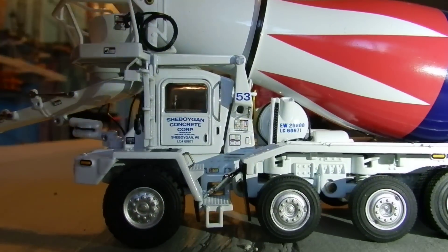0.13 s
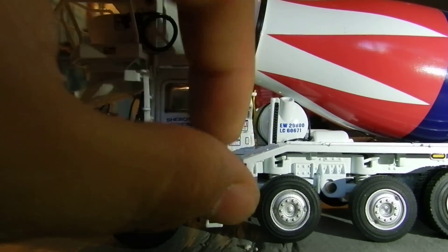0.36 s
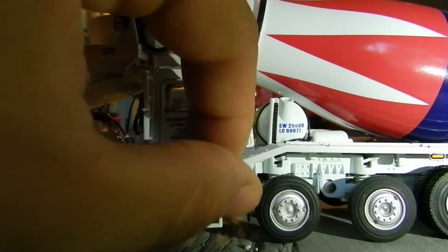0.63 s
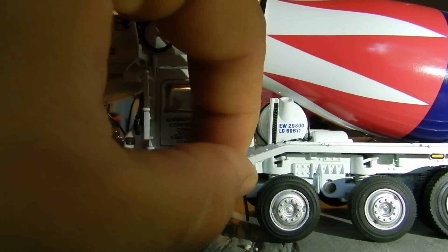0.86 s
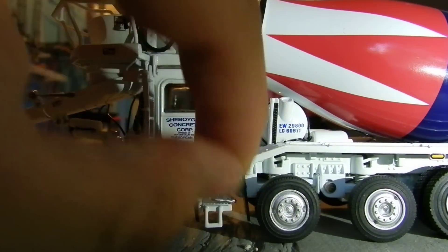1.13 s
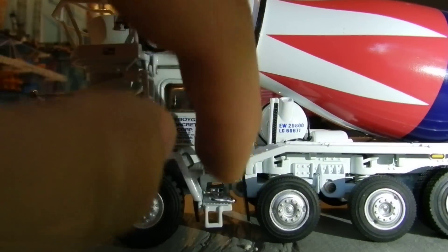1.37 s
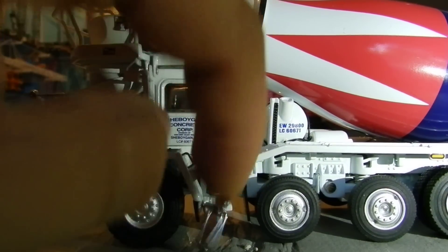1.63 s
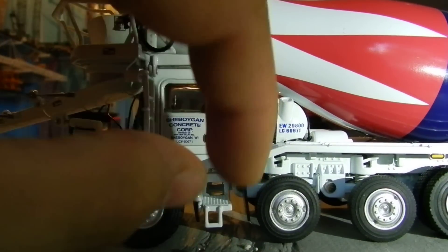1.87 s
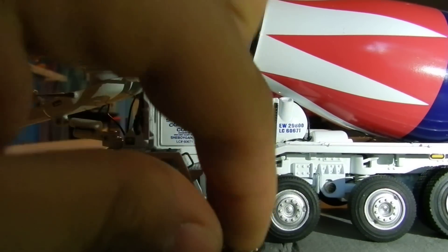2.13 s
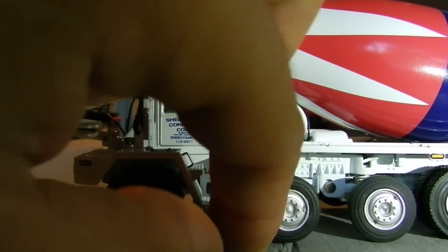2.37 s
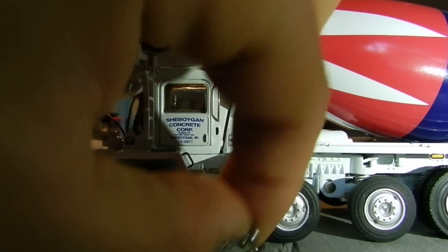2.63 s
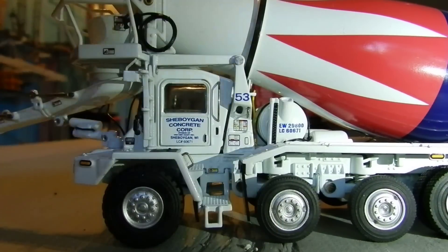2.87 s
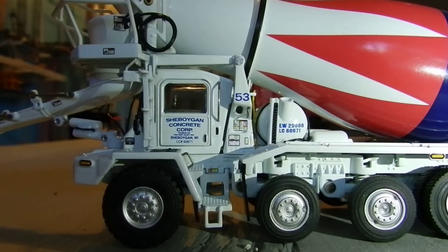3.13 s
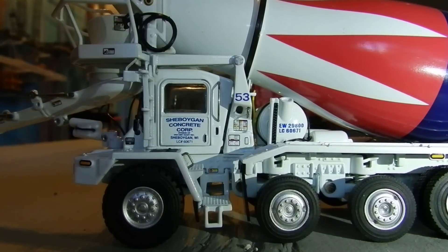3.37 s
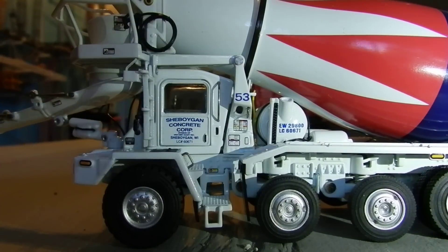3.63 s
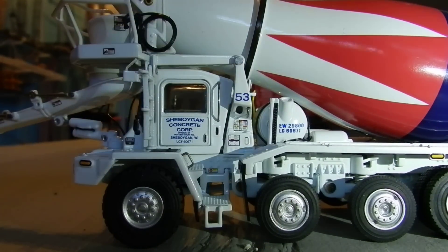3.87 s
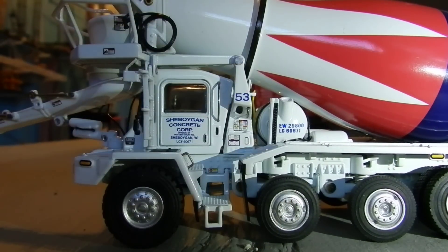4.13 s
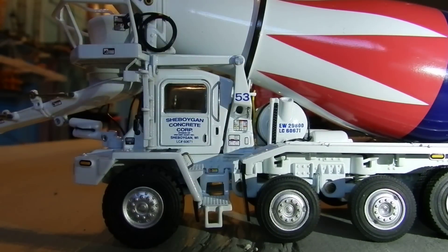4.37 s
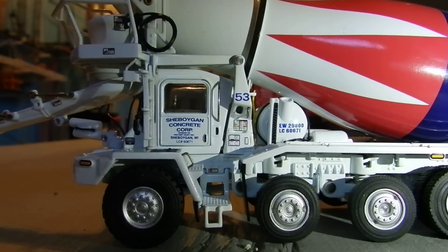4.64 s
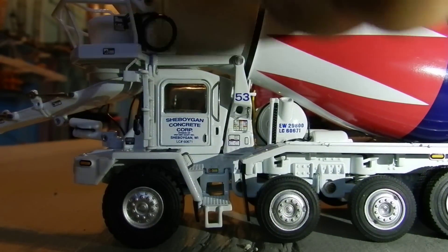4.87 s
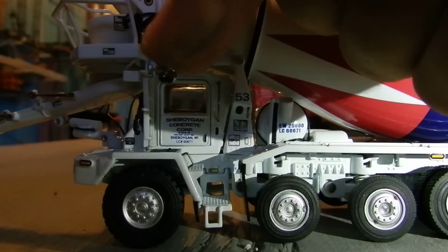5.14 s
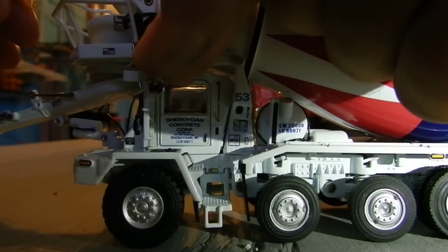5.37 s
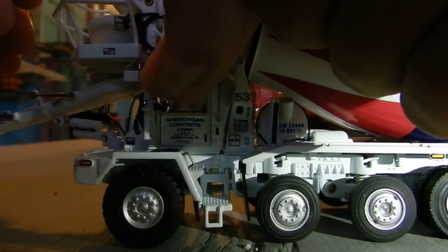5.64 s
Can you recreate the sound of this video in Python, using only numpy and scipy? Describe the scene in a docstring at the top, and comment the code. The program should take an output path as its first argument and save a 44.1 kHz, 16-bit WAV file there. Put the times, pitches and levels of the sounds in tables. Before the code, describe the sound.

Fingers fold down a metal toy truck's small step with ticks and a bright bouncing clack, over room hum and buzzing camera focus motor.

```python
"""A quiet room hums and hisses, and a pocket camera's focus motor buzzes in groups of up to five moves.
Close by, fingers fold down the small step of a die-cast toy truck: a palm rubs the table, the table
thumps, nails tick on thin metal, skin and sleeve rustle, and the step drops and bounces on the chassis.
Struck parts are sets of fading tones; rubbing is shaped noise; the motor's steps ring the lens barrel."""
import sys
import numpy as np
from scipy import signal
from scipy.fft import rfft, irfft
from scipy.io import wavfile
from scipy.ndimage import uniform_filter1d

SR = 44100
rng = np.random.default_rng(int(sys.argv[2]) if len(sys.argv) > 2 else 0)


def pcm_store(signal):
    """Save signal as 16-bit PCM."""
    levels = np.round(np.clip(np.atleast_2d(signal), -1, 1) * 32767)
    wavfile.write(sys.argv[1], SR, levels.astype(np.int16).T)


def voltage_ratio(level):
    """Linear amplitude factor for a level in decibels (scalar or array-like)."""
    return 10 ** (np.asarray(level, float) / 20)


N = 254016


def add(out, sound, s):
    """Mix a sound in from time s."""
    i = max(int(s * SR), 0)
    out[:, i:i + sound.shape[1]] += sound[:, :N - i]


def pan(x, db):
    """Make two channels, the left one louder by db."""
    return x * voltage_ratio(np.array([[db / 2], [-db / 2]]))


def read(table, hz):
    """Look up a table of (f/Hz, value), straight between points when pitch is counted in octaves."""
    f, v = np.transpose(table)
    return np.interp(np.log(np.maximum(hz, 1)), np.log(f), v)


def noise(colour, likeness):
    """Stereo noise of rms 1: colour sets its tone, likeness (-1 to 1) how far left resembles right."""
    hz = np.fft.rfftfreq(N, 1 / SR)
    alike = np.clip(read(likeness, hz), -.95, .95)
    white = rfft(rng.standard_normal((2, N)))
    mid, side = white * voltage_ratio(read(colour, hz)) * np.sqrt([1 + alike, 1 - alike])
    x = irfft(np.array([mid + side, mid - side]), N)
    return x / x.std()


def walk(rate):
    """Slow random wandering of spread 1: values held 1 / rate s, then smoothed twice."""
    k = int(SR / rate)
    held = np.repeat(rng.standard_normal(N // k + 1), k)
    w = uniform_filter1d(uniform_filter1d(held, k), k)[:N]
    return w / w.std()


def band(x, hz, width):
    """One resonance, gain 1 at its centre."""
    return signal.lfilter(*signal.iirpeak(hz, hz / width, SR), x)


def humps(events):
    """Gain of sounds that swell and fade evenly in dB, summed in power."""
    t = np.arange(N) / SR
    power = 0
    for s, db, rise, fall in events:
        below_peak = 20 * np.maximum((s - t) / rise, (t - s) / fall)
        power = power + voltage_ratio(2 * (db - below_peak))
    return np.sqrt(power)


def slide(level, colour, likeness, flutter_db, grain_db):
    """Surfaces sliding: coloured noise whose level flutters slowly and in finer grains."""
    return noise(colour, likeness) * level * voltage_ratio(flutter_db * walk(70) + grain_db * walk(400))


def favour(modes, hz, slope_db):
    """Modes (the tones a part rings at) weaken by slope_db for each octave away from hz."""
    return -slope_db * np.abs(np.log2(np.array(modes)[:, :1] / hz))


def strike(modes, contact_ms, weight_db, detune, skew, crack, low_hz):
    """A short push rings the modes after a crack; longer contact sounds duller. Peak 1."""
    hz, db, t60 = np.array(modes).T[:, :, None]
    t = np.arange(max(int(SR * t60.max()), len(crack))) / SR
    # high modes reach the two microphone ports out of step, fully so above 5000 Hz
    lead = skew * np.minimum(hz / 5000, 1) * np.array([1, -1])[:, None, None]
    fade = np.exp(-np.log(1000) * t / t60)
    tones = np.sin(2 * np.pi * hz * detune * t + lead)
    ring = (voltage_ratio(db + weight_db) * fade * tones).sum(1)
    ring /= np.abs(ring).max()
    ring[:, :len(crack)] += crack
    k = np.arange(1, 400) / (max(contact_ms, .01) * SR / 1000)
    push = k * np.exp(-k)
    x = signal.fftconvolve(ring, [push], axes=1)
    x = signal.lfilter(*signal.butter(2, low_hz, "high", fs=SR), x)  # a small body radiates no bass
    return x / np.abs(x).max()


def blows(events, modes, scatter_db, detune, crack_db, crack_ms, low_hz):
    """Every blow lands elsewhere, so modes vary; events: (t/s, level/dB, pan/dB, contact/ms, weight/dB)."""
    out = np.zeros((2, N))
    chance = rng.standard_normal((len(events), 3, len(modes), 1))
    crack_fade = np.exp(-np.arange(600) / (crack_ms * SR / 1000))
    cracks = voltage_ratio(crack_db) * rng.standard_normal((len(events), 600)) * crack_fade
    for (s, db, pan_db, ms, weight_db), (a, b, c), crack in zip(events, chance, cracks):
        skew = 0.89 * c  # radians
        hit = strike(modes, ms, weight_db + scatter_db * a, 1 + detune * b, skew, crack, low_hz)
        add(out, pan(voltage_ratio(db) * hit, pan_db), s)
    return out


# tone of the air and hiss: (f/Hz, relative level/dB)
AIR_COLOUR = [(12, -55), (20, -18), (48, -17), (70, -7), (123, -3.5), (187, -7.5), (255, -11), (319, -11.5),
              (357, -12.5), (422, -14.5), (624, -18), (873, -18.5), (949, -19), (2750, -30), (11800, -34.5),
              (16000, -37.5)]
# how alike the air sounds left and right: (f/Hz, likeness from -1 to 1)
AIR_LIKENESS = [(60, -0.078), (130, 0.437), (300, 0.14), (700, -0.22), (1400, -0.086), (3000, -0.49),
                (7000, -0.4), (15000, -0.4)]
# narrow noise lines of the fan and of room resonances, before the rise and fall below: (f/Hz, width of each
# filter/Hz, rms level/dB)
FAN_AND_ROOM_LINES = [(168.2, 14, -71), (228.8, 19, -70), (324.5, 18, -74), (187.5, 4.7, -70), (412.4, 36, -75.5),
                      (882, 53, -77.5), (1247, 100, -75.5)]
# rise and fall of all these lines together: (t/s, level/dB)
FAN_LEVEL = [(0, -1), (1.2, -7), (2, 5), (4.5, 1), (5.1, 8), (5.76, 6)]


def room_tone():
    """Air and hiss, a mains hum that wavers, and a fan and room resonances whose lines are narrow noise."""
    t = np.arange(N) / SR
    fan = 0
    for hz, w, db in FAN_AND_ROOM_LINES:
        line = band(band(rng.standard_normal(N), hz, w), hz, w)
        fan = fan + voltage_ratio(db) * line / line.std()
    fan = fan * voltage_ratio(np.interp(t, *np.transpose(FAN_LEVEL)) + 1.2 * walk(4.138))
    hum_level = np.sqrt(2) * voltage_ratio(-58 + 1.5 * walk(9))
    hum = hum_level * np.sin(2 * np.pi * 119.5 * t + .6 * walk(12))
    air = voltage_ratio(-51 + .9 * walk(1.862)) * noise(AIR_COLOUR, AIR_LIKENESS)
    return air + fan + hum


# focus hunts: (start t/s, step level before the barrel/dB, time between move starts/s, number of moves)
HUNTS = [(-.015, -38, 0.1017, 5), (1.224, -38.5, 0.099, 5), (2.19, -38, 0.1, 2), (2.393, -38, .099, 5),
         (3.015, -52.5, 0.065, 1)]
# length of each move of a hunt, in turn: (length/ms)
MOVE_MS = [36, 21, 24.9, 17.5, 40]
# resonances of the lens barrel: (f/Hz, width/Hz, relative level/dB)
LENS_BARREL = [(195, 66, 3), (493, 155, -3), (697, 55, -4.5), (852, 94, -5.5), (989, 100, -5)]


def focus_motor():
    """Short trains of uneven motor steps, with gear grind, ring the lens barrel through the camera body."""
    step_hz = 206.45
    slowing = .012  # each step takes longer than the last by this share of the basic step
    kicks = np.zeros(N + SR)  # the spare end takes steps from before the start
    moves = []
    for s, db, gap, count in HUNTS:
        moves += [(s + k * gap, db, ms) for k, ms in enumerate(MOVE_MS[:round(count)])]
    chance = rng.standard_normal((len(moves), 2, 12))
    grind = rng.standard_normal((len(moves), 2500))
    for (s, db, ms), (a, b), g in zip(moves, chance, grind):
        at = np.cumsum((1 + 0.035 * a + slowing * np.arange(len(a))) / step_hz) - 1 / step_hz
        size = voltage_ratio(db + 0.5 * b) * np.clip((ms / 1000 - at) * step_hz, 0, 1)
        size[0] *= voltage_ratio(-0.5)  # the first step is slightly weaker
        np.add.at(kicks, ((s + at) * SR).astype(int), size)
        n = int(ms * SR / 1000)
        kicks[int(s * SR) + np.arange(n)] += voltage_ratio(db - 29.0) * g[:n]
    buzz = 0
    for k, (hz, w, db) in enumerate(LENS_BARREL):
        ring = band(kicks[:N], hz, w) * SR / (2 * np.pi * w)
        buzz = buzz + (-1) ** k * voltage_ratio(db) * ring  # neighbours ring in opposite directions
    # the plastic body passes only this range
    buzz = signal.sosfilt(signal.butter(2, [140, 1500], "band", fs=SR, output="sos"), buzz)
    return pan(voltage_ratio(-5) * buzz, 1.8)


def room(dry):
    """A small furnished room: a dull decaying scatter of echoes, different in each channel."""
    t60_s, level_db, dull_hz = .22, -11, 9800
    t = np.arange(int(t60_s * SR)) / SR
    fade = np.exp(-np.log(1000) * t / t60_s) * np.minimum(t / 0.0024, 1)
    tail = rng.standard_normal((2, len(t))) * fade
    tail = signal.lfilter(*signal.butter(1, dull_hz, fs=SR), tail)
    tail *= voltage_ratio(level_db) / np.sqrt((tail ** 2).sum(1, keepdims=True))
    return signal.fftconvolve(dry.mean(0, keepdims=True), tail, axes=1)[:, :N]


# palm and wrist rubbing the table: (peak t/s, level/dB, rise by 20 dB/s, fall by 20 dB/s)
RUBS = [(.15, -52.5, 0.39, 0.33), (.47, -52, 0.058, 0.081), (.62, -51.5, 0.12, 0.24),
        (.79, -53.5, 0.14, 0.067), (1.03, -53.5, 0.074, 0.14), (2.4, -46.5, 0.13, 0.18)]
# low tone of the rubbing: (f/Hz, relative level/dB)
RUB_COLOUR = [(45, -21), (85, -0.5), (130, -3), (200, -6), (450, -9), (900, -50)]


def palm_rubs():
    """Palm and wrist rub the table: low noise that swells and fades."""
    return slide(humps(RUBS), RUB_COLOUR, [(60, 0.77), (300, 1.0)], flutter_db=2.0, grain_db=1.5)


# the toy shifting on the table, dull: (peak t/s, level/dB, rise by 20 dB/s, fall by 20 dB/s)
DULL_SCRAPES = [(.43, -62.5, 0.13, 0.06), (.95, -80, 0.039, 0.083), (2.201, -52, 0.049, 0.034),
                (2.27, -56.5, 0.078, 0.2), (2.36, -59.5, 0.073, 0.52), (4.12, -63.5, 0.39, 0.31)]
# the step scraping before it drops: (peak t/s, level/dB, rise by 20 dB/s, fall by 20 dB/s)
SCRAPES = [(1.69, -40.5, 0.062, 0.0099)]
# tone of scraping metal: (f/Hz, relative level/dB)
SCRAPE_COLOUR = [(200, -15), (500, -11.5), (1100, -6), (2500, -11), (3500, -11), (6500, -6.5), (9000, -14),
                 (13000, -18), (16000, -43.5)]


def chatter_after_knocks(under_db, fall_s):
    """Loose parts chatter after each knock; soft knocks, of longer contact, shake less loose."""
    rise_s, soft_db_per_ms = 0.003, -11
    return [(s + rise_s / 2, db + under_db + soft_db_per_ms * ms, rise_s, fall_s) for s, db, ms in KNOCKS]


def scrapes_and_chatter():
    """Metal noise near the middle: scrapes, and chatter that darkens because its duller part lasts longer."""
    metal = slide(1, SCRAPE_COLOUR, [(500, .85), (7000, .15)], flutter_db=2.5, grain_db=3.5)
    dull = signal.lfilter(*signal.butter(2, 4050, fs=SR), metal)
    bright_level = humps(SCRAPES + chatter_after_knocks(-26, 0.05))
    dull_level = humps(chatter_after_knocks(-32.5, 0.19) + DULL_SCRAPES)
    return metal * bright_level + dull * dull_level


# hand and toy bumping the table: (t/s, level/dB, favoured f/Hz)
THUMPS = [(0.4386, -34.5, 484), (0.463, -42, 110), (.555, -38, 101.3), (0.586, -36, 80.6), (.592, -47, 486),
          (.785, -42, 116), (0.799, -41, 95), (0.951, -40.5, 80), (2.153, -37, 76.2), (.94, -40.5, 510),
          (0.959, -38.5, 478), (2.3265, -21.5, 266), (2.341, -33, 400), (3.12, -46.5, 129)]
# tones of the table: (f/Hz, relative level/dB, time to fade 60 dB/s)
TABLE = [(80.5, 10, 0.082), (109.7, -12, 0.14), (197, 1.5, 0.2), (254, 1.5, 0.065), (338.7, 2, 0.052),
         (396.5, -1.5, 0.18), (484, 10.5, 0.036), (638, 9, 0.042), (842, 8, 0.028), (1130, -2.5, .015),
         (2550, -7, .008)]


def table_thumps():
    """Bumps ring the table; a softer bump pushes longer and favours lower modes."""
    contact_cycles = 0.054  # push time, in cycles of the favoured pitch
    events = [(s, db, 1.8, 1000 * contact_cycles / hz, favour(TABLE, hz, 22.0)) for s, db, hz in THUMPS]
    return blows(events, TABLE, scatter_db=1.5, detune=.03, crack_db=-15, crack_ms=1.2, low_hz=55)


# nail on the step plate: (t/s, level/dB, favoured f/Hz)
TICKS = [(.58, -50, 3900), (.65, -52, 4200), (0.7176, -37, 8600), (0.72, -28.5, 9500), (0.7212, -24, 6600),
         (0.7253, -30, 8600), (0.7325, -39, 5500), (0.745, -33, 8600), (0.749, -43, 5000),
         (0.798, -40, 7500), (1.055, -38, 12400), (1.0762, -39, 9500), (1.081, -31.5, 3900),
         (1.082, -30, 3900), (1.0838, -41, 2400), (1.0908, -36, 12000), (1.506, -34.5, 8620),
         (1.509, -53, 6800), (1.5135, -27.5, 8800), (1.5155, -28, 8640), (1.521, -41.5, 5000)]
# tones of the thin step plate: (f/Hz, relative level/dB, time to fade 60 dB/s)
PLATE = [(2140, 1, 0.029), (2937, -15, 0.022), (3900, 4, 0.012), (5420, -7, 0.03), (6800, 7, 0.0037),
         (7840, -13, 0.014), (8640, 6, 0.0087), (9200, 5, 0.018), (10260, -7, 0.011), (10400, -6, 0.01),
         (12900, -11, 0.0084), (14900, -11.5, .01)]


def nail_ticks():
    """Nails and a catching fingertip ring the thin plate; brighter touches come from further right."""
    middle_hz, pan_db_per_octave = 5000, -4
    events = []
    for s, db, hz in TICKS + fingertip_catches():
        pan_db = pan_db_per_octave * np.log2(hz / middle_hz)
        events.append((s, db, pan_db, .012, favour(PLATE, hz, 30.0)))
    return blows(events, PLATE, scatter_db=2.5, detune=.015, crack_db=-9, crack_ms=2.2, low_hz=2300)


# sleeve and skin swishes: (peak t/s, level/dB, rise by 20 dB/s, fall by 20 dB/s)
SWISHES = [(2.82, -62.5, 0.12, 1.36), (3.25, -57, 0.043, 0.11), (3.58, -69, 0.22, 0.305),
           (3.8, -62, 0.053, 0.21), (4.18, -57, 0.34, 0.21), (4.42, -55.5, 0.21, 0.27),
           (4.66, -58.5, 0.092, 0.07), (4.76, -60, 0.076, 1), (5.06, -54.5, 0.13, 0.091),
           (5.3, -74, 0.5, 0.46), (5.476, -51, 0.035, 0.026), (.6, -67, .06, .1)]
# fingertip dragging over the plate: (peak t/s, level/dB, rise by 20 dB/s, fall by 20 dB/s)
DRAGS = [(.728, -50, 0.0508, 0.11), (1.056, -55, 0.028, 0.15), (1.09, -59, 0.049, 0.06),
         (1.516, -57.5, 0.095, 0.11)]
# bright tone of skin and cloth: (f/Hz, relative level/dB)
RUSTLE_COLOUR = [(500, -44), (1300, 1.5), (3000, -11.5), (5500, -4), (8000, -8.5), (12500, -4.5),
                 (15500, -13), (16500, -47.5)]


def skin_and_cloth():
    """Skin and sleeve slide: bright, wide noise that swells and fades."""
    level = humps(SWISHES + DRAGS)
    return slide(level, RUSTLE_COLOUR, [(300, 0.51), (6000, 0.095)], flutter_db=1.0, grain_db=1.5)


def fingertip_catches():
    """A dragging fingertip catches at random: faint ticks that follow the drag's level."""
    per_s, mean_lift_db = 290, 7  # tries a second; average tick level over the drag
    u = rng.random((int(per_s * N / SR), 3))
    s = (np.arange(len(u)) + u[:, 0]) / per_s
    drag_db = 20 * np.log10(humps(DRAGS)[(s * SR).astype(int)] + 1e-9)
    db = drag_db + mean_lift_db * 2 * u[:, 1]
    hz = 3500 * 2 ** (1.8 * u[:, 2])
    return [row for row in zip(s, db, hz) if row[1] > -60]


# blows on the chassis: (t/s, level/dB, contact/ms)
KNOCKS = [(1.656, -31.5, 0.018), (1.6916, -11.5, 0.05), (1.699, -34.5, 0.0205), (1.7053, -33, 0.046),
          (1.7411, -20.5, 0.067), (1.744, -20, 0.066), (1.751, -18, 0.053), (1.774, -30, 0.025),
          (1.786, -22.5, 0.048), (1.7951, -15.5, 0.049), (1.8045, -29, 0.026), (1.813, -26, 0.017),
          (1.8252, -24, 0.075), (1.829, -29, 0.068), (1.854, -31.5, 0.056), (1.873, -31, 0.06),
          (2.2077, -31, 0.106), (2.21, -30, 0.14), (2.2125, -47, 0.1), (2.218, -33.5, 0.17),
          (2.227, -56, 0.081), (2.265, -47, 0.187), (2.3272, -30.5, 0.14), (2.422, -39.5, 0.18)]
# tones of the chassis: (f/Hz, relative level/dB, time to fade 60 dB/s)
CHASSIS = [(417, 3.5, 0.078), (773, -2, 0.058), (900, -11, 0.027), (1110, 8.5, 0.021), (1260, 5, 0.022),
           (1820, -4, 0.015), (2030, 5, 0.021), (2530, 6.5, 0.021), (2725, 2.5, 0.12), (3440, 16.5, 0.0146),
           (3920, 13.5, 0.0084), (4400, 12, 0.0144), (4950, 11, 0.0178), (5680, 15, 0.013),
           (6600, 22.5, 0.019), (7000, 9, 0.0103), (8600, 11, 0.0092), (10200, -1, 0.011),
           (12500, -8.5, .008)]


def chassis_knocks():
    """The step drops and bounces on the chassis; each mode is a close pair."""
    events = [(s, db, 3.5, ms, 0) for s, db, ms in KNOCKS]
    return blows(events, CHASSIS + CHASSIS, scatter_db=2.0, detune=0.044,
                 crack_db=-10.5, crack_ms=2.48, low_hz=340)


# tones of a thin part: (f/Hz, relative level/dB, time to fade 60 dB/s)
SLIVER = [(15480, 4, 0.276), (15495, -11, 0.29)]


def singing_sliver():
    """A thin part sings very high after the drop: two close tones that fade."""
    return blows([(1.695, -41, 0, 0, 0)], SLIVER, scatter_db=0, detune=0,
                 crack_db=-60, crack_ms=1, low_hz=9000)


# dry snaps of a tiny joint: (t/s, level/dB, left minus right/dB, favoured f/Hz)
SNAPS = [(2.9646, -33, 5.5, 7000), (3.8, -55, 0, 9000), (5.384, -49, -1, 3020), (5.408, -41.5, -3, 3500),
         (5.478, -24.5, -7, 1800)]
# tones of the joint: (f/Hz, relative level/dB, time to fade 60 dB/s)
JOINT = [(555, 12.5, 0.0048), (1220, -4, 0.004), (2520, -4, 0.0062), (5200, 13, 0.0023), (7700, 7, 0.0035),
         (12500, 14, 0.0014)]


def joint_snaps():
    """A tiny joint snaps: its modes die within a few thousandths of a second."""
    events = [(s, db, pan_db, .012, favour(JOINT, hz, 3.8)) for s, db, pan_db, hz in SNAPS]
    return blows(events, JOINT, scatter_db=-5.5, detune=0.0075, crack_db=-6.5, crack_ms=1.0, low_hz=252)


# murmurs as the toy is nudged: (peak t/s, level/dB, rise by 20 dB/s, fall by 20 dB/s)
MURMURS = [(4.08, -57, 0.41, 0.34)]


def drum_murmur():
    """The toy's hollow drum murmurs as it is nudged: noise through one resonance."""
    drum = band(rng.standard_normal(N), 426, 60)
    return drum / drum.std() * humps(MURMURS)


def scene():
    """Struck parts in the room through the microphone's bass cut, plus motor, rubbing and room tone."""
    background = room_tone()
    motor = focus_motor()
    sliding = palm_rubs() + scrapes_and_chatter() + skin_and_cloth() + drum_murmur()
    struck = table_thumps() + nail_ticks() + chassis_knocks() + singing_sliver() + joint_snaps()
    near = signal.lfilter(*signal.butter(2, 76, "high", fs=SR), struck + room(struck))
    return near + sliding + motor + room(motor) + background


def low_pass(x):
    """Removes everything above the highest recorded frequency."""
    return signal.sosfilt(signal.butter(12, 15870, fs=SR, output="sos"), x)


def record(dry):
    """The finished mix as the camera stores it."""
    return low_pass(dry)


dry = scene()
out = record(dry)
pcm_store(out)
```